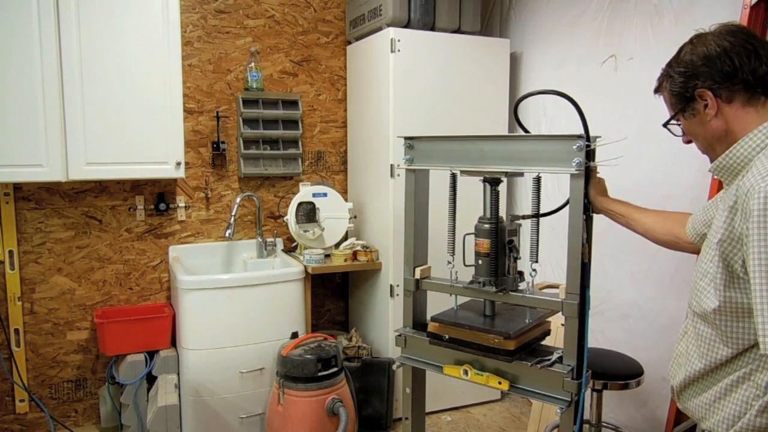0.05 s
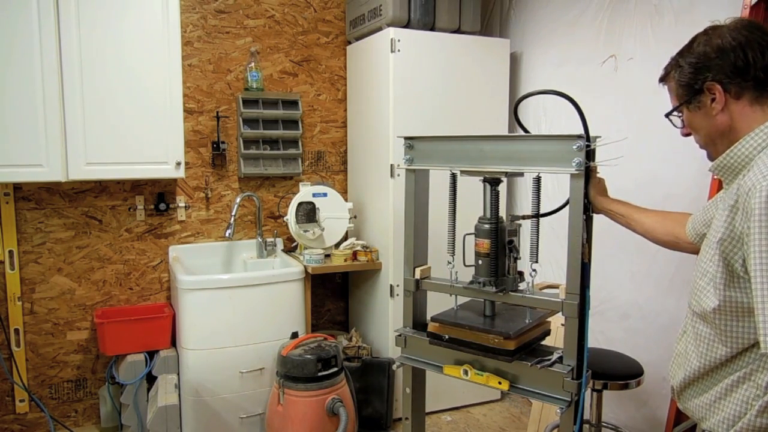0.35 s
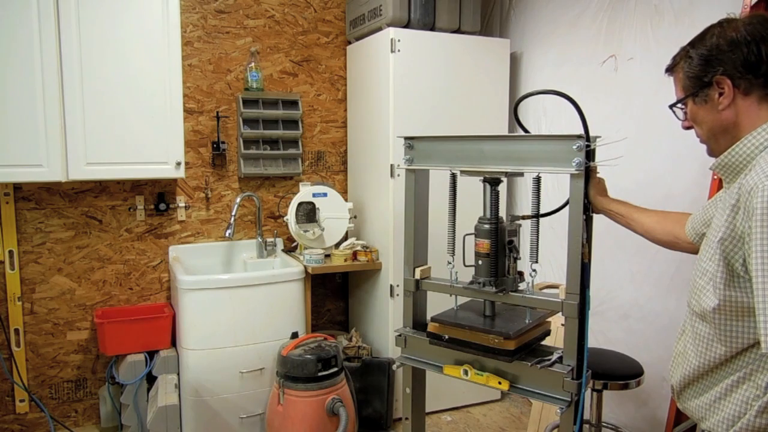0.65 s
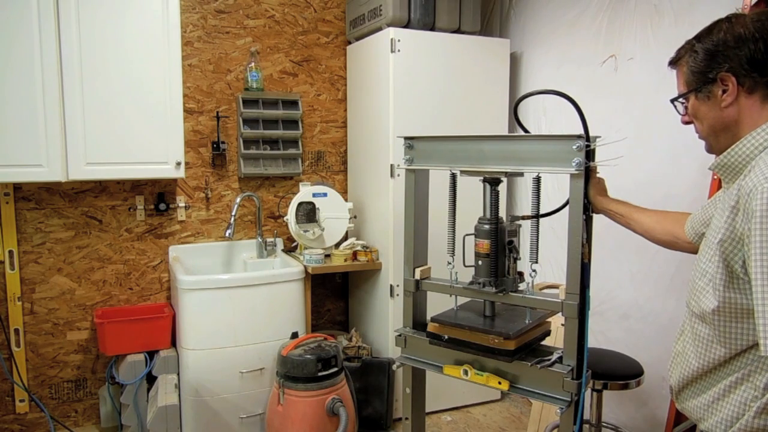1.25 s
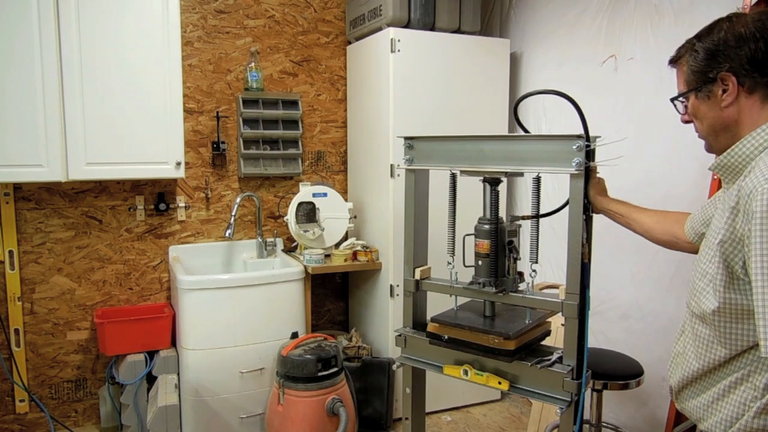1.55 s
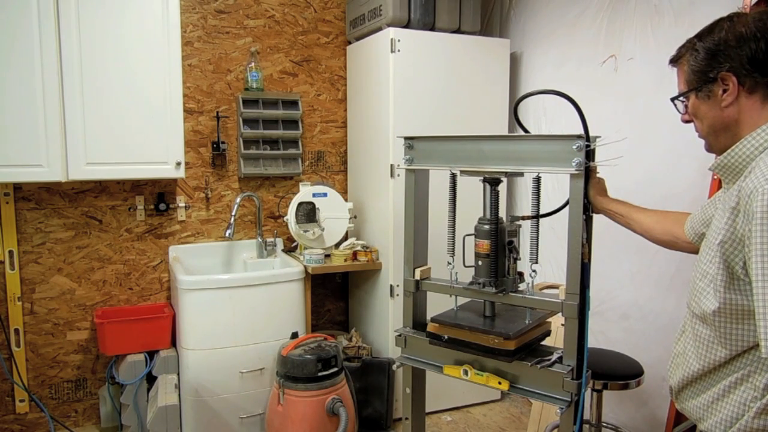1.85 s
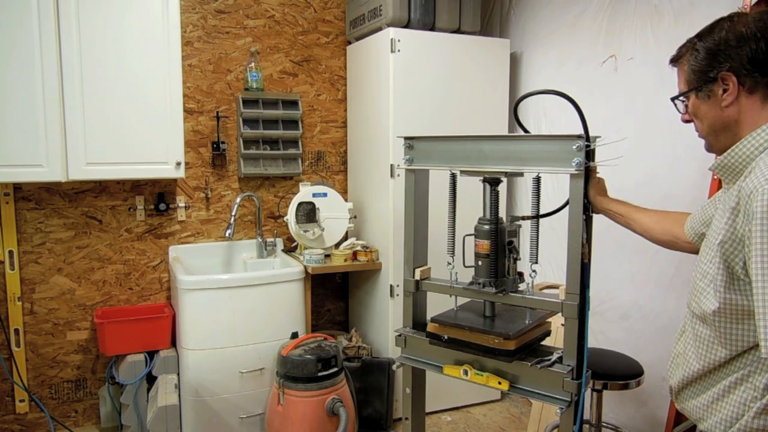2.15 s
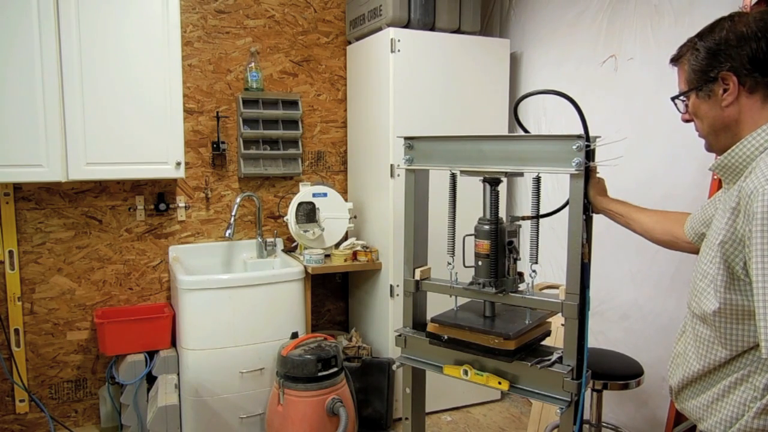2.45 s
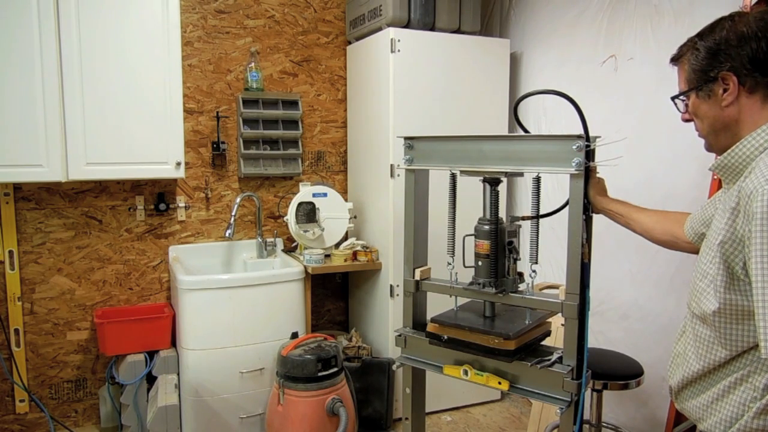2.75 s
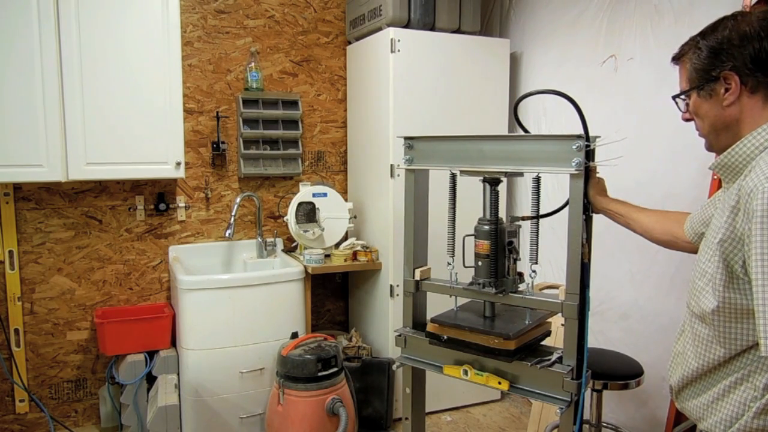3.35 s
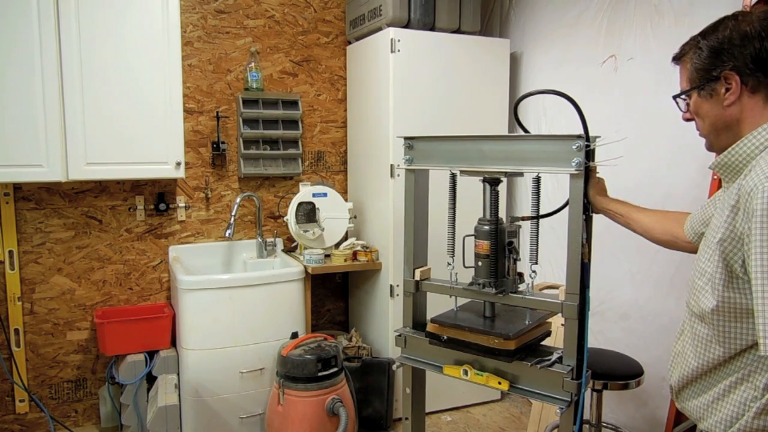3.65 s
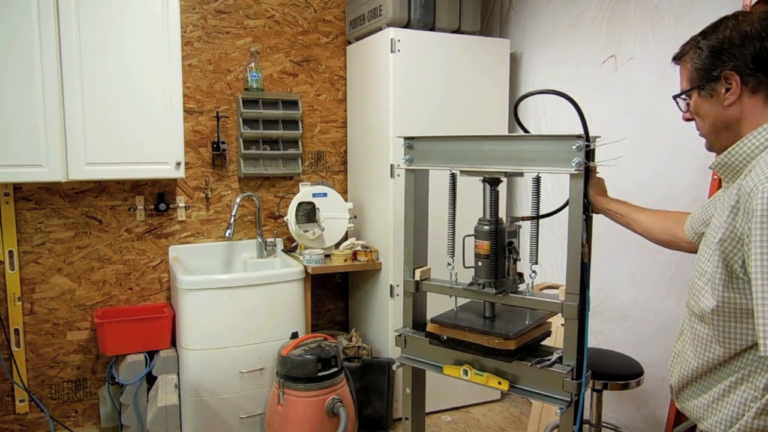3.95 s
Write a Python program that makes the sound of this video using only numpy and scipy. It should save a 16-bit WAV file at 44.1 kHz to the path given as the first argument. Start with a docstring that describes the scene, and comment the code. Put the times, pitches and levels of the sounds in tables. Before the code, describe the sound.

Rapid, regular hissing and rattling from an air pump working a shop press.

```python
"""An air-driven pump works the jack of a shop press, about 7 strokes a second, slowing under load.
Each stroke: the valve whistles, then opens with a low thump and a blast of exhaust hiss; the piston
knocks twice, ringing jack and frame, and drives home with a short gulp. Air leaks past the piston
until the next stroke, louder on some. A small workshop reflects it all over a steady low rumble."""
import sys
import numpy as np
from scipy import signal
from scipy.fft import rfft, irfft
from scipy.io import wavfile
from scipy.ndimage import uniform_filter1d

SR = 44100
rng = np.random.default_rng(int(sys.argv[2]) if len(sys.argv) > 2 else 0)


def log_audio(samples):
    """Write samples as a 16-bit WAV file to the path given in sys.argv[1]."""
    # one column per channel
    frames = np.atleast_2d(samples).T
    # limit to full scale, then quantise
    limited = np.clip(frames, -1, 1)
    pcm = np.round(limited * 32767).astype(np.int16)
    wavfile.write(sys.argv[1], SR, pcm)


N = 176400
LEAD_S = .25  # pre-roll: the pump is already running at 0 s
M = N + round(LEAD_S * SR)
TIME_S, HZ = np.arange(M) / SR - LEAD_S, np.fft.rfftfreq(M, 1 / SR)

# Pump strokes. Each row: start in seconds, then stroke, leak and whistle gains in dB.
STROKES = [(-0.101, 3, -4.5, -17), (0.0296, -2, -0.5, -2), (0.16, -0.6, -9.5, 4), (0.2901, -1, -5, -4),
           (0.4211, -1.1, -1, 2), (0.553, -0.7, -6, -3), (0.6857, -0.5, -1, -21), (0.8188, -1.6, -8, -10),
           (0.9505, -0.5, -3, 3), (1.082, -1.3, -7.5, -11), (1.2131, -0.0, -0.5, -3),
           (1.3462, -1.3, -4, -5), (1.4789, -0.5, -8.5, -1), (1.6115, -0.0, 0, 6), (1.7457, -0.6, -3.5, 2),
           (1.8796, -0.8, -5, 1), (2.014, -1, -2, 5), (2.1492, -0.5, -9.5, 2), (2.2865, -0.3, -7, 5),
           (2.4241, 0.1, -7, -7), (2.564, -0.2, -1.5, 0), (2.704, -0.7, -0.5, -3), (2.8458, 0.5, -4.5, -25),
           (2.9872, -0.2, -4, 2), (3.1299, 0.0, 0, -6), (3.2719, -0.5, -4.5, -13), (3.4149, -0.5, -0.5, 5),
           (3.5589, 0, 0.5, -15), (3.7028, 0.5, -0.5, -1), (3.8485, 0.4, -6, 2), (3.9941, -1.5, 0, -10)]


def exhaust(level_db=-9, ahead_s=.0021, rise_s=.0039, hold_s=.018, fall_db_per_s=207.5):
    """The valve snaps open and the cylinder empties in a turbulent jet."""
    # Jet spectrum. Each row: frequency in Hz, relative density in dB.
    jet_spectrum = [(100, -9.5), (400, -11), (750, -9), (1400, -6), (3000, -4.5), (4100, -1.5), (6500, -2),
                    (9500, 0.1), (12200, 1.5), (14000, 0.5), (16000, -3.5)]
    # Exhaust port resonances. Each row: centre in Hz, width in Hz, lift in dB.
    port_modes = [(1403, 43, 2), (2600, 160, 0.5), (2680, 100, 2), (4460, 200, 0), (4700, 53, -2.5),
                  (9250, 200, 0)]
    flow, t = np.zeros(M), np.arange(SR // 4) / SR
    blast = np.minimum(t / rise_s, 1) * amp(-fall_db_per_s * np.maximum(t - hold_s, 0))
    for start_s, stroke_db, _, _ in STROKES:
        add(flow, start_s - ahead_s, amp(stroke_db) * blast)
    return amp(level_db) * turbulence(jet_spectrum, port_modes, flow)


def leak(level_db=-17, delay_s=.034, rise_s=.04, stop_ahead_s=.0062, fall_db_per_s=34.5):
    """Air slips past the piston while the cylinder refills."""
    # Leak spectrum. Each row: frequency in Hz, relative density in dB.
    leak_spectrum = [(100, -6), (400, -0.5), (750, -5), (1500, -1), (2500, -0.5), (4000, 2), (7000, 0),
                     (12500, 0.5), (14000, -3.5), (16000, -10.5)]
    # Air motor resonances. Each row: centre in Hz, width in Hz, lift in dB.
    motor_modes = [(976, 55, 6.5), (1563, 29, 6.5), (1530, 40, -2.5), (1980, 54, -1), (2350, 50, 4),
                   (2460, 90, 3), (3830, 150, 1.5)]
    flow = np.zeros(M)
    for start_s, _, leak_db, _, period_s in cycles():
        t = np.arange(0, period_s - delay_s - stop_ahead_s, 1 / SR)
        add(flow, start_s + delay_s, np.minimum(t / rise_s, 1) * amp(leak_db - fall_db_per_s * t))
    return amp(level_db) * turbulence(leak_spectrum, motor_modes, flow)


def turbulence(spectrum, modes, flow, flutter_db=1.43, wet_db=-1, directions=3):
    """Resonant air noise follows the flow, flutters and sprays into the room in several directions."""
    lift_db = sum(db / (1 + (2 * (HZ - hz) / width_hz) ** 2) for hz, width_hz, db in modes)
    spectra = rfft(rng.standard_normal((directions, M))) * amp(log_interp(spectrum, HZ) + lift_db)
    flutter = unit_rms(uniform_filter1d(rng.standard_normal(M), size=60))
    flow = flow * amp(flutter_db * flutter)
    coherence = .17 + .83 * diffuse_coherence()
    direct = unit_rms(irfft(stereo(spectra, coherence), M)) * flow
    wet = sum(room(spray * flow) for spray in unit_rms(irfft(spectra, M))) / np.sqrt(directions)
    return (direct + amp(wet_db) * wet) / np.hypot(1, amp(wet_db) / 2)


def whistle(level_db=-19, ahead_s=.0071, width_s=.0037, wet_db=-5):
    """A thin squeak as the valve begins to lift."""
    # Valve whistle bands. Each row: centre in Hz, half-width in Hz, relative level in dB.
    bands = [(13030, 150, 1), (11700, 450, -4)]
    gain = sum(amp(db) / np.sqrt(half_hz) / (1 + ((HZ - hz) / half_hz) ** 4) for hz, half_hz, db in bands)
    envelope = sum(amp(db) * gaussian(start_s - ahead_s, width_s) for start_s, _, _, db in STROKES)
    tone = unit_rms(irfft(rfft(rng.standard_normal((2, M))) * gain, M)) * envelope
    return amp(level_db) * (tone + amp(wet_db) * room(tone[0]))


def thump(pulse_db=-17.5, pulse_s=.0013, push_db=-33, push_s=.0057, spread_db=1, wet_db=-1.5):
    """Released air makes a smooth pressure pulse on a slower push and rings the low resonances."""
    # Low resonances. Each row: frequency in Hz, level in dB, T60 in seconds.
    boom_modes = [(37.8, -40, .25), (127, -36, .25), (160.3, -34, 0.43)]
    pulses, push, boom = np.zeros((3, M))
    ringing = ring(boom_modes, np.arange(SR // 2) / SR)
    for start_s, stroke_db, _, _ in STROKES:
        db = stroke_db + spread_db * rng.standard_normal()
        pulses -= amp(pulse_db + db) * gaussian(start_s, pulse_s)
        push -= amp(push_db + db) * (1 - ((TIME_S - start_s) / push_s) ** 2) * gaussian(start_s, push_s)
        add(boom, start_s, amp(db) * ringing)
    pressure = pulses + push + boom + amp(wet_db) * room(pulses)
    high_pass = HZ ** 4 / (HZ ** 4 + 21 ** 4)  # 21 Hz corner
    return irfft(rfft(pressure) * high_pass, M)


def piston(blow_db=-21, width_s=.00044, spread_db=2, wet_db=-1.5):
    """The piston knocks as it turns and again at the end of its travel, ringing jack and frame."""
    # Knocks of one stroke. Each row: time as a fraction of the cycle, gain in dB.
    knocks = [(.055, -2.5), (.295, 2)]
    # Jack and frame modes. Each row: frequency in Hz, level in dB, T60 in seconds.
    frame_modes = [(325.4, -38.5, .2), (423.3, -37, 0.27), (500, -49, 0.067), (573, -43, .18),
                   (637.5, -36, 0.25), (957, -42, 0.2)]
    blows, rings = np.zeros((2, M))
    t = np.arange(SR // 3) / SR
    ringing = ring(frame_modes, t)
    u = t / width_s - 3
    blow = u * np.exp(.5 - .5 * u ** 2)  # bipolar pulse, peak 1
    for start_s, stroke_db, _, _, period_s in cycles():
        for fraction, knock_db in knocks:
            force = amp(stroke_db + knock_db + spread_db * rng.standard_normal())
            knock_s = start_s + fraction * period_s
            add(blows, knock_s, force * amp(blow_db) * blow)
            add(rings, knock_s, force * ringing)
    return blows + rings + amp(wet_db) * room(blows)


def gulp(level_db=-28, delay_s=.02, rise_s=.027, t60_s=.22, glide_s=.03966, wet_db=-9):
    """A short rising tone as the piston drives home and its chamber shrinks."""
    gulps, t = np.zeros(M), np.arange(SR // 8) / SR
    glide_hz = np.interp(t, [0, glide_s], [271.4, 609])
    attack = np.sqrt(np.minimum(t / rise_s, 1))
    envelope = attack * amp(level_db - 60 * np.maximum(t - rise_s, 0) / t60_s)
    for start_s, stroke_db, _, _ in STROKES:
        detune = 1 + .025 * rng.standard_normal()
        phase = 2 * np.pi * np.cumsum(glide_hz) * detune / SR
        add(gulps, start_s + delay_s, amp(stroke_db) * envelope * np.sin(phase))
    return gulps + amp(wet_db) * room(gulps)


def cylinder_glides(wet_db=-4):
    """One noisy air resonance falls as the cylinder empties, another rises as it refills."""
    # Gliding resonances. Each row: start and end as fractions of the cycle, start and end pitch in Hz,
    # width in Hz, level in dB.
    glides = [(0.023, .36, 2540, 2314, 70, -29), (.28, .92, 1440, 1903, 70, -36)]
    tones = np.zeros(M)
    for start_s, stroke_db, _, _, period_s in cycles():
        for begin, end, from_hz, to_hz, width_hz, level_db in glides:
            progress = np.linspace(0, 1, round((end - begin) * period_s * SR))
            pole = np.exp(-np.pi * width_hz / SR)
            noise = rng.standard_normal((2, SR // 4))
            wander = unit_rms(signal.lfilter([1], [1, -pole], noise))[:, -len(progress):]
            phase = 2 * np.pi * np.cumsum(from_hz + (to_hz - from_hz) * progress) / SR
            tone = wander[0] * np.cos(phase) + wander[1] * np.sin(phase)
            arch = 2 * np.sqrt(progress * (1 - progress))
            add(tones, start_s + begin * period_s, amp(stroke_db + level_db) * arch * tone)
    return tones + amp(wet_db) * room(tones)


def dip_gain(width_s=.0019):
    """The level dips briefly just before some blasts."""
    # Level dips. Each row: centre in seconds, gain at the centre in dB.
    dips = [(0.6821, -9), (0.813, -10), (1.0778, -3), (1.3428, -4), (1.7386, -5), (2.2825, -2),
            (2.4203, -1), (2.5596, -3), (2.7005, -4), (2.839, -16), (3.2685, -4.5), (3.5543, -7),
            (3.9907, -7)]
    return amp(sum(db * gaussian(centre_s, width_s) for centre_s, db in dips))


def room(source, predelay_s=.003, slot_samples=16):
    """Workshop reverberation: sparse reflections of random sign, the treble dying first."""
    # Workshop decay. Each row: frequency in Hz, T60 in seconds.
    decay = [(60, 0.57), (500, 0.32), (2000, 0.25), (6000, 0.3), (12000, 0.08), (16000, 0.057)]
    count = SR // 2 // slot_samples
    slots = round(predelay_s * SR) + np.arange(count) * slot_samples
    arrivals = slots + rng.integers(0, slot_samples, (2, count))
    taps = np.zeros((2, SR))
    np.put_along_axis(taps, arrivals, rng.choice([-1., 1.], arrivals.shape), 1)
    hz, t, frames = signal.stft(taps, SR, nperseg=256)
    frames *= amp(-60 * t / log_interp(decay, hz)[:, None])
    tail = rfft(signal.istft(frames, SR)[1], M)
    tail /= np.sqrt(uniform_filter1d(abs(tail) ** 2, size=400, axis=1))  # flatten the spectrum
    response = irfft(stereo(tail, diffuse_coherence()), M)[:, :SR // 2]
    return signal.fftconvolve(source[None], response, axes=1)[:, :M]


def rumble(level_db=-38.5):
    """Steady low noise of the workshop."""
    # Rumble spectrum. Each row: frequency in Hz, relative density in dB.
    spectrum = [(15, -18), (40, -11), (150, 7), (400, -8.5), (1000, -19), (4000, -20)]
    noise = stereo(rfft(rng.standard_normal((2, M))), diffuse_coherence())
    return amp(level_db) * unit_rms(irfft(noise * amp(log_interp(spectrum, HZ)), M))


def cycles():
    """Stroke rows with the period in seconds appended."""
    periods_s = np.diff([row[0] for row in STROKES])
    return [(*row, period_s) for row, period_s in zip(STROKES, np.append(periods_s, periods_s[-1]))]


def ring(modes, t):
    """Struck modes as decaying sines."""
    return sum(amp(db - 60 * t / t60_s) * np.sin(2 * np.pi * hz * t) for hz, db, t60_s in modes)


def gaussian(centre_s, sigma_s):
    """Bell curve in time, peak 1."""
    return np.exp(-.5 * ((TIME_S - centre_s) / sigma_s) ** 2)


def stereo(spectra, coherence):
    """Mixes two independent spectra to left and right with the given coherence."""
    mid = np.sqrt((1 + coherence) / 2) * spectra[0]
    side = np.sqrt((1 - coherence) / 2) * spectra[1]
    return np.array([mid + side, mid - side])


def diffuse_coherence(corner_hz=1400):
    """Diffuse sound is alike left and right only in the bass."""
    return .99 / (1 + (HZ / corner_hz) ** 3)


def amp(db):
    """Decibels to gain."""
    return 10 ** (np.asarray(db) / 20)


def unit_rms(x):
    """Scales to rms 1."""
    return x / np.sqrt(np.mean(x ** 2) + 1e-20)


def log_interp(points, hz):
    """Interpolates a table on a log-frequency axis."""
    points_hz, values = np.transpose(points)
    return np.interp(np.log(hz + 1), np.log(points_hz + 1), values)


def add(mix, start_s, sound):
    """Adds a sound into the mix at start_s."""
    part = mix[max(round((start_s + LEAD_S) * SR), 0):][:len(sound)]
    part += sound[:len(part)]


def scene():
    """The pump, its hiss a little to the right, over the workshop rumble."""
    balance = amp([[-.45], [.45]])
    hiss = (exhaust() + leak() + cylinder_glides() + whistle()) * balance
    pump = (hiss + gulp() + piston()) * dip_gain() + thump()
    return (pump + rumble())[:, -N:]


def record(dry):
    """Full-scale clipping, then a 15.9 kHz low-pass."""
    low_pass = signal.firwin(511, 15900, window=("kaiser", 7), fs=SR)
    return signal.oaconvolve(np.clip(dry, -1, 1), low_pass[None], "same")


dry = scene()
out = record(dry)
log_audio(out)
```